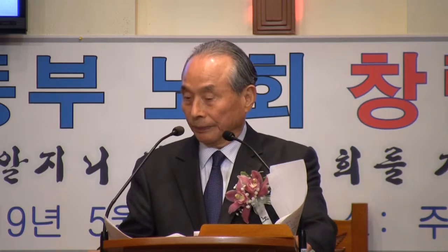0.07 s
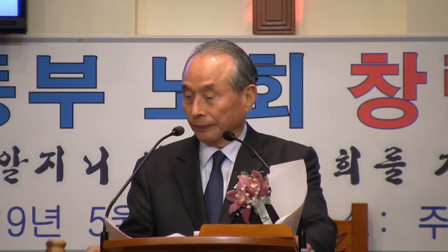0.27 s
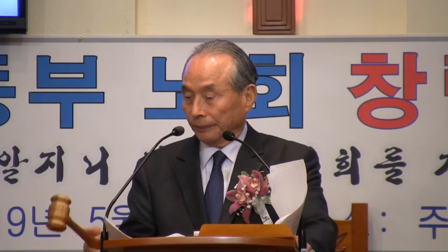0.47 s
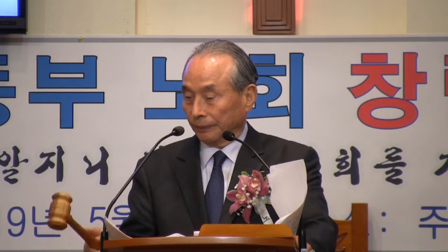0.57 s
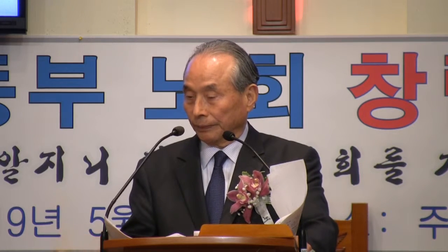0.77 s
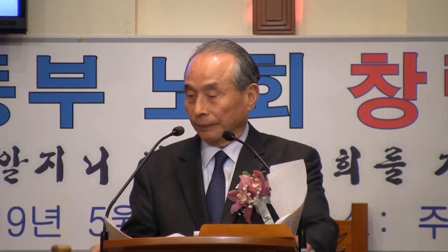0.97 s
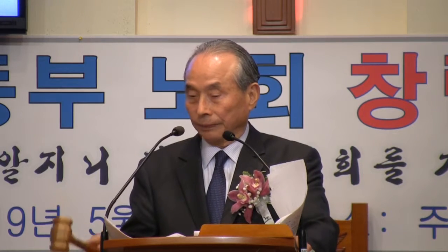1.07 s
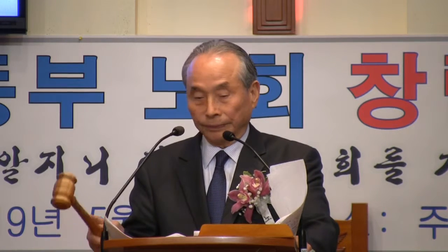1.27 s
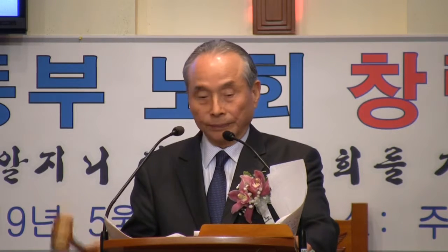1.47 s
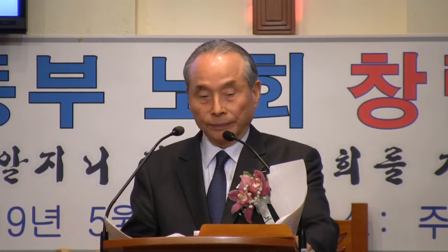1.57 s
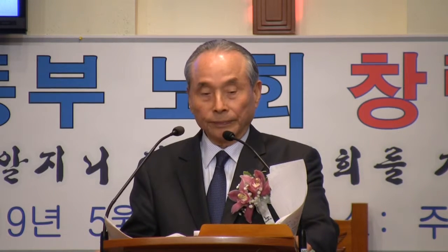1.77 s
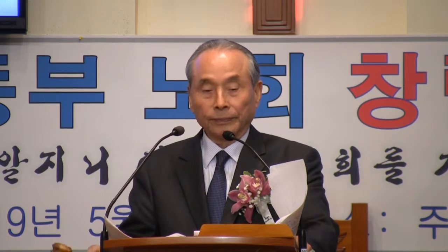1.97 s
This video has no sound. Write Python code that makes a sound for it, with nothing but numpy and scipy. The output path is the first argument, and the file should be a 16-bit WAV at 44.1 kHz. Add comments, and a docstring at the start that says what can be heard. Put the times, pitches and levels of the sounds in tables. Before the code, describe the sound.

A wooden gavel raps its block on a lectern three times at an even pace, each hard crack followed by low boom and hall echo; soft bumps fall between, over ventilation rumble, picked up fairly close in stereo.

```python
"""Ventilation rumbles in a reverberant meeting hall; a wooden gavel strikes its block on a lectern three times.
Each blow cracks (flattened noise burst), rings briefly in the wood (decaying sines) and sets the hall booming.
Soft bumps and one faint tick (noise bursts) fall between, and a sleeve rustles faintly (filtered noise).
The recorder's limiter clamps down on each knock and lets the reverberation swell back."""
import sys
import numpy as np
from scipy import signal
from scipy.fft import rfft, irfft
from scipy.io import wavfile
from scipy.ndimage import uniform_filter1d

SR = 44100
rng = np.random.default_rng(int(sys.argv[2]) if len(sys.argv) > 2 else 0)


def store_wav(level_fs):
    """Save 16-bit WAV to argv[1]."""
    pcm = np.round(np.clip(np.atleast_2d(level_fs), -1, 1) * 32767)
    wavfile.write(sys.argv[1], SR, pcm.T.astype(np.int16))


N = 89655


def from_db(db):
    """Decibels to amplitude gain."""
    return 10 ** (np.asarray(db) / 20)


def seconds():
    """Time of every sample."""
    return np.arange(N) / SR


def bins():
    """Frequencies in Hz of a full-length spectrum."""
    return np.fft.rfftfreq(N, 1 / SR)


def at_hz(points, hz, column=1):
    """One table column interpolated on a log-frequency axis."""
    table = np.array(points)
    return np.interp(np.log(hz + 1), np.log(table[:, 0]), table[:, column])


def delayed(x, delay_s):
    """The sound delay_s later, cut to the same length."""
    count = int(np.clip(delay_s * SR, 0, N - 1))
    silence = np.zeros_like(x[..., :count])
    return np.concatenate([silence, x[..., :N - count]], axis=-1)


def envelope(rise_s, t60_s):
    """Exponential rise (time constant rise_s) and decay, cut off after two t60."""
    length = int(np.clip(2 * t60_s * SR, 2, N))
    t = np.arange(length) / SR
    out = np.zeros(N)
    out[:length] = (1 - np.exp(-t / rise_s)) * np.exp(-np.log(1000) * t / t60_s)
    return out


# Stereo width. Each row: frequency in Hz, side minus mid in dB.
STEREO_WIDTH = [(30, -12), (130, -13.5), (500, -14.5), (1500, -14.5), (3000, -10.5), (6000, -5),
                (12000, -1)]


def spread_stereo(mid, side):
    """Mid and side spectra to two microphones, less alike towards the treble."""
    width = from_db(at_hz(STEREO_WIDTH, bins()))
    return (mid + width * side * [[1], [-1]]) / np.sqrt(1 + width ** 2)


def stereo_spectrum():
    """Spectrum of white noise on two microphones."""
    mid, side = rfft(rng.standard_normal((2, N)))
    return spread_stereo(mid, side)


def noise(shape_db):
    """Coloured stereo noise of rms 1."""
    x = irfft(stereo_spectrum() * from_db(shape_db), N)
    return x / x.std()


# Ventilation and hiss colour. Each row: frequency in Hz, relative density in dB per Hz.
AIR_COLOUR = [(20, -7), (35, -38), (50, -9.5), (75, -3.5), (95, -8.5), (122, 4), (170, 2.5), (240, -8.5),
              (400, -17), (800, -21.5), (1600, -26), (3200, -30.5), (6400, -37.5), (10000, -42),
              (15500, -45.5)]
AIR_DB = -35.5


def ventilation():
    """Steady low-heavy noise of moving air, with hiss."""
    return from_db(AIR_DB) * noise(at_hz(AIR_COLOUR, bins()))


# The sleeve rustles as the arm swings. Each row: time in seconds, level in dB.
RUSTLE_LEVEL = [(1.25, -71), (1.44, -54.5), (1.599, -60), (1.7, -84)]
# Cloth colour. Each row: frequency in Hz, relative density in dB per Hz.
CLOTH_COLOUR = [(1000, -27), (4000, 0), (9000, 1), (15000, -4)]


def rustle():
    """Cloth friction: treble noise under a slow level curve."""
    time_s, db = np.transpose(RUSTLE_LEVEL)
    level = from_db(np.interp(seconds(), time_s, db))
    return level * noise(at_hz(CLOTH_COLOUR, bins()))


# Soft bumps and one faint tick. Each row: start in seconds, level in dB, pitch in Hz,
# scuff in dB re the body of the burst.
SOFT_BUMPS_AND_TICK = [(0.599, -32.5, 316, -16), (0.699, -37.5, 347, -20), (1.268, -42, 3600, -11),
                       (1.502, -32.5, 470, -21.5)]
BUMP_RISE_S, BUMP_T60_S, BUMP_WIDTH_OCT = 0.0032, 0.12, 0.46


def bumps_and_tick():
    """Soft bumps and one faint tick: noise bursts, each around its own pitch, with broadband scuffing."""
    out = 0
    for start_s, db, hz, scuff_db in SOFT_BUMPS_AND_TICK:
        octaves = np.log2((bins() + 1) / hz)
        body = np.exp(-(octaves / BUMP_WIDTH_OCT) ** 2)
        scuff = from_db(scuff_db) / (1 + (bins() / 2000) ** 2)
        burst = noise(20 * np.log10(body + scuff)) * envelope(BUMP_RISE_S, BUMP_T60_S)
        out = out + from_db(db) * delayed(burst, start_s)
    return out


# Hall response. Each row: frequency in Hz, reverberation level in dB, t60 in seconds.
HALL_BANDS = [(97, -8.5, 2.6), (193, 13.5, 1), (328, 9, 1.12), (429, 5, 0.87), (583, 9, 0.96),
              (770, 3, 0.68), (890, 6, 0.66), (1320, 2.5, 0.6), (1455, 4, 0.73), (1728, 3.5, 0.56),
              (2420, -4, 0.76), (3036, -2.5, 0.36), (3510, 3, .9), (3730, -1, 0.7), (4900, -7.5, 0.58),
              (5620, -3, 0.67), (7400, -12.5, 0.59), (11700, -8, 0.33), (16000, -17, 0.22)]
HALL_DELAY_S, HALL_BUILD_S = 0.008, 0.0042
EVEN_HZ = 62  # power smoothing span


def hall(x):
    """Diffuse reverberation: noise decaying at its own rate in each of eight bands."""
    white, tail = stereo_spectrum(), 0
    centres_hz = np.geomspace(100, 13000, 8)
    for hz, share in zip(centres_hz, np.eye(len(centres_hz))):
        weight = np.interp(np.log(bins() + 1), np.log(centres_hz), share)
        band = irfft(white * weight, N)
        tail = tail + band * envelope(HALL_BUILD_S, at_hz(HALL_BANDS, hz, column=2))
    # even out the broad spectrum, then impose the table's levels
    response = rfft(tail)
    power = np.mean(np.abs(response) ** 2, axis=0)
    power = uniform_filter1d(power, max(int(EVEN_HZ * N / SR), 1))
    coloured = response / np.sqrt(power) * from_db(at_hz(HALL_BANDS, bins()))
    tail = irfft(coloured, N)[:, :3 * N // 4]
    mono = x.mean(axis=0)[None]
    return delayed(signal.fftconvolve(mono, tail, axes=1)[:, :N], HALL_DELAY_S)


MODE_SPREAD_DB = 2  # standard deviation, new for every blow


def ring(modes, rise_s):
    """Struck modes: decaying sines of alternating sign and slightly random strength."""
    spread_db = MODE_SPREAD_DB * rng.standard_normal(len(modes))
    out = 0
    for k, (hz, db, t60_s) in enumerate(modes):
        sine = np.sin(2 * np.pi * hz * seconds())
        out = out + (-1) ** k * from_db(db + spread_db[k]) * envelope(rise_s, t60_s) * sine
    return out


# Low boom of the lectern filling the hall. Each row: frequency in Hz, level in dB, t60 in seconds.
LECTERN_BOOM = [(126.9, -31, 1.4), (164.3, -24.5, 1.04), (206.7, -17.5, 0.43), (236.6, -23.5, 0.6),
                (299.5, -33, 1.08), (524, -19, 0.67), (605, -34, 0.74)]
BOOM_DELAY_S, BOOM_BUILD_S = 0.025, 0.027


def boom():
    """Low resonances that build up after each blow and outlast it."""
    out = 0
    for start_s, db, *_ in BLOWS:
        out = out + from_db(db) * delayed(ring(LECTERN_BOOM, BOOM_BUILD_S), start_s + BOOM_DELAY_S)
    return out


# Contact of many short-lived modes. Each row: frequency in Hz, relative density in dB per Hz.
CRACK_COLOUR = [(100, -17.5), (250, -14.5), (450, -4), (900, -6.5), (1600, -1.5), (3000, -5), (4300, -8.5),
                (6500, -7), (9000, -11.5), (12000, -21.5), (16000, -33)]
CRACK_DB, CRACK_T60_S, CRACK_RISE_S = -1, 0.038, 0.00051  # t60 before flattening


def crack():
    """Dense contact burst: decaying noise flattened in spectrum, then coloured."""
    shape = envelope(CRACK_RISE_S, CRACK_T60_S)
    burst = rfft(rng.standard_normal((2, N)) * shape)
    mid, side = burst / (np.abs(burst) + 1e-9)
    x = irfft(spread_stereo(mid, side) * from_db(at_hz(CRACK_COLOUR, bins())), N)
    x = x * envelope(CRACK_RISE_S, 10 * CRACK_T60_S)
    # same energy as the envelope alone
    return from_db(CRACK_DB) * x * np.sqrt(np.mean(shape ** 2) / np.mean(x ** 2))


FAVOUR_WIDTH_OCT = 0.3


def favour(modes, favoured_hz, lift_db):
    """The point of contact lifts or weakens modes near one pitch."""
    out = []
    for hz, db, t60_s in modes:
        octaves = np.log2(hz / favoured_hz)
        out.append((hz, db + lift_db * np.exp(-(octaves / FAVOUR_WIDTH_OCT) ** 2), t60_s))
    return out


# Gavel blows. Each row: start in seconds, strength in dB, gavel ring in dB, crack treble in dB,
# pitch favoured by the point of contact in Hz, its lift in dB.
BLOWS = [(0.1120, 2, 1, 3, 3340, 3), (0.8733, 1, -5.5, -2, 2400, -0.5), (1.6332, 3.5, -1, 5, 2750, 5.5)]
# Block and lectern top. Each row: frequency in Hz, level in dB, t60 in seconds.
BLOCK = [(460.6, -18.5, 0.067), (534, -20.5, 0.054), (604, -18, 0.068), (742, -12.5, 0.025),
         (1050, -14, 0.0088), (1235, -7, 0.03), (1389, -8, 0.041), (1550, -4, 0.033), (1735, -3.5, 0.028),
         (1880, -8.5, 0.043), (2020, -13.5, 0.022), (2502, 0, 0.028), (2705, -15.5, 0.074)]
# Gavel head and handle. Each row: frequency in Hz, level in dB, t60 in seconds.
GAVEL = [(2950, -19, 0.017), (3323, -9, 0.058), (3470, -9.5, 0.042), (3818, -10, 0.035), (4170, -15, 0.015),
         (4715, -7, 0.042), (4857, -4.5, 0.039), (5157, -5.5, 0.028), (5660, -12, 0.035), (5904, -7, 0.026),
         (6695, -8, 0.027), (6840, -4, 0.025), (8210, -11, 0.051), (8870, -11, 0.032)]
TREBLE_HZ = 3800


def gavel():
    """Each blow: modal ring of block and gavel, and the crack of the contact."""
    wood, cracks = 0, 0
    treble_filter = signal.butter(1, TREBLE_HZ, "high", fs=SR, output="sos")
    for start_s, db, gavel_db, treble_db, favoured_hz, lift_db in BLOWS:
        block_ring = ring(favour(BLOCK, favoured_hz, lift_db), CRACK_RISE_S)
        gavel_ring = ring(favour(GAVEL, favoured_hz, lift_db), CRACK_RISE_S)
        wood = wood + from_db(db) * delayed(block_ring + from_db(gavel_db) * gavel_ring, start_s)
        contact = crack()
        treble = signal.sosfilt(treble_filter, contact)
        contact = contact + (from_db(treble_db) - 1) * treble
        cracks = cracks + from_db(db) * delayed(contact, start_s)
    return wood, cracks


# Nearby surfaces. Each row: delay in seconds, level in dB.
NEAR_REFLECTIONS = [(.0029, -8), (.0082, -1.5)]


def near_sound(knocks):
    """Direct sound plus its early reflections from nearby surfaces."""
    out = knocks
    for delay_s, db in NEAR_REFLECTIONS:
        out = out + from_db(db) * delayed(knocks, delay_s)
    return out


NEAR_DB, PAN_DB = -3, -0.57  # pan: left gain, right opposite
WOOD_WET_DB, CRACK_WET_DB, BUMP_WET_DB = -1.5, 3, -5.5  # sends to the hall


def scene():
    """Near knocks, bumps and tick, the hall's answer, boom, rustle and ventilation."""
    wood, cracks = gavel()
    small_hits = bumps_and_tick()
    near = from_db(NEAR_DB) * near_sound(wood + cracks)
    wood_hall = hall(from_db(WOOD_WET_DB) * wood[None])
    noise_hall = hall(from_db(CRACK_WET_DB) * cracks + from_db(BUMP_WET_DB) * small_hits)
    mix = near + small_hits + wood_hall + noise_hall + boom() + rustle() + ventilation()
    return mix * from_db([[PAN_DB], [-PAN_DB]])


LIMIT_DB, LIMIT_SLOPE, RELEASE_DB_PER_S = -11.5, 0.81, 55.5  # slope: dB cut per dB over
ATTACK_S, DETECTOR_S, LIMIT_LAG_S = 0.002, 0.0077, 0.0015
CLIP_TOP = 0.98


def record(dry):
    """A limiter too slow for the first milliseconds, soft overload, and a steep top cut."""
    power = uniform_filter1d(np.mean(dry ** 2, axis=0), max(int(DETECTOR_S * SR), 1))
    level_db = 10 * np.log10(np.abs(power) + 1e-12)
    wanted_cut_db = LIMIT_SLOPE * np.maximum(level_db - LIMIT_DB, 0)
    # peak hold with a linear release in dB
    fall_db = RELEASE_DB_PER_S * seconds()
    held_cut_db = np.maximum.accumulate(wanted_cut_db + fall_db) - fall_db
    pole = np.exp(-1 / (ATTACK_S * SR))
    cut_db = signal.lfilter([1 - pole], [1, -pole], held_cut_db)
    x = dry * from_db(-delayed(cut_db, LIMIT_LAG_S)) / CLIP_TOP
    x = CLIP_TOP * x / (1 + x ** 4) ** 0.25
    top_cut = signal.cheby2(16, 60, 16500, fs=SR, output="sos")  # stopband edge in Hz
    return signal.sosfilt(top_cut, x)


dry = scene()
out = record(dry)
store_wav(out)
```